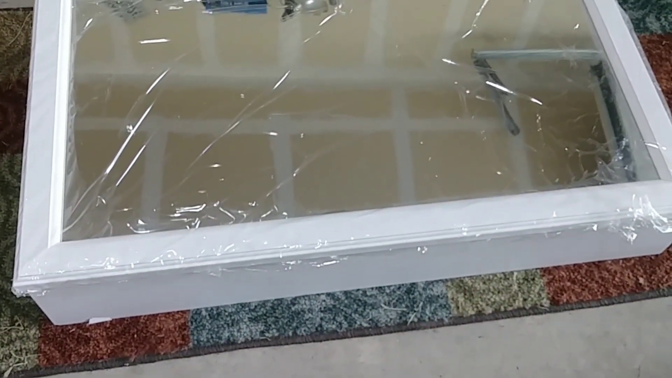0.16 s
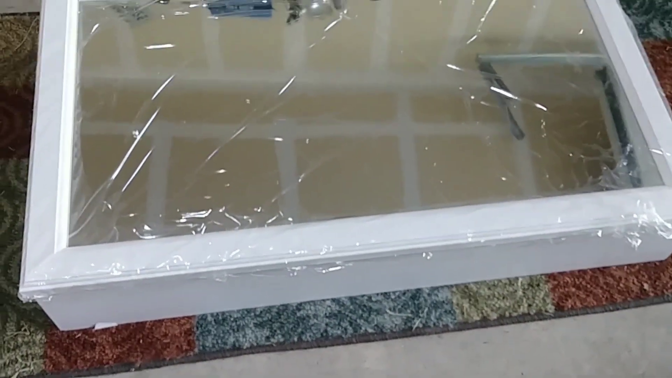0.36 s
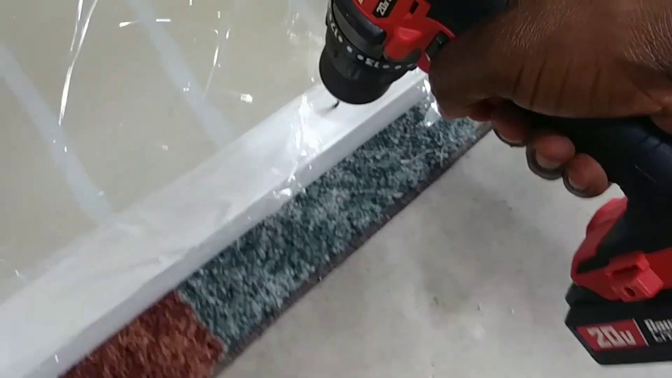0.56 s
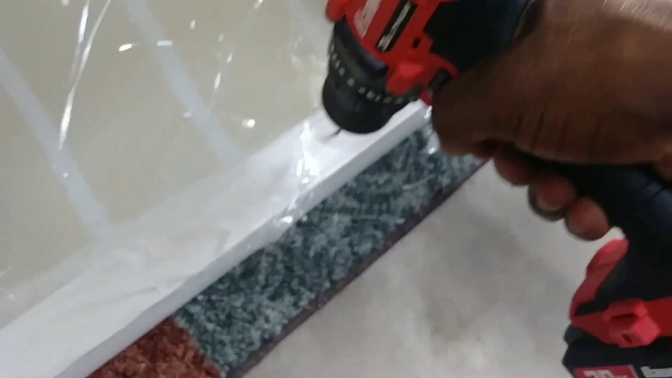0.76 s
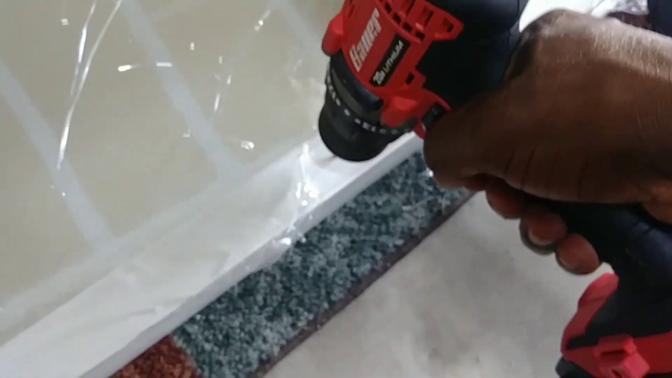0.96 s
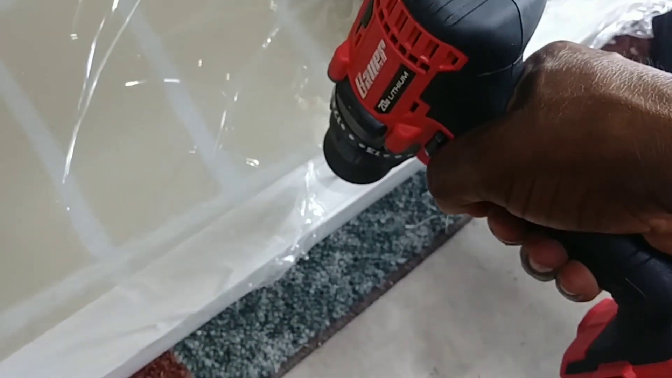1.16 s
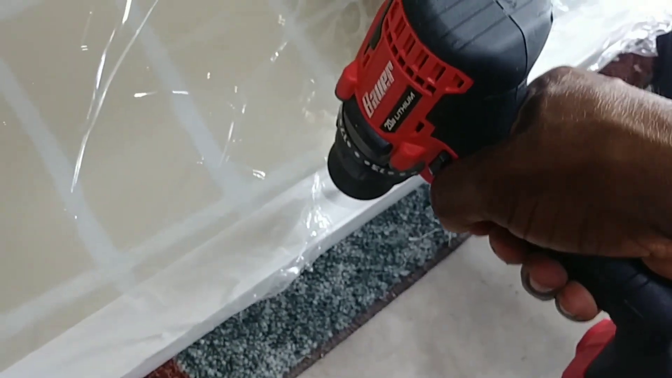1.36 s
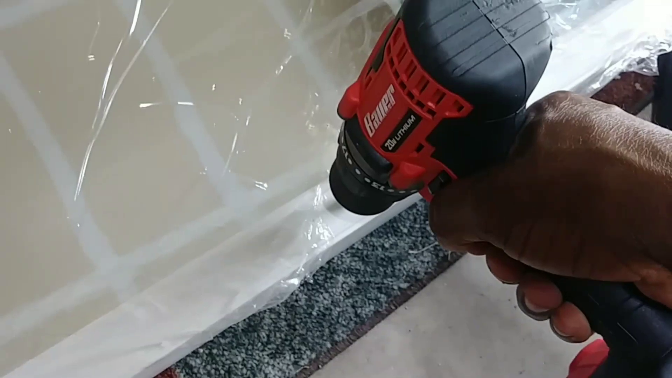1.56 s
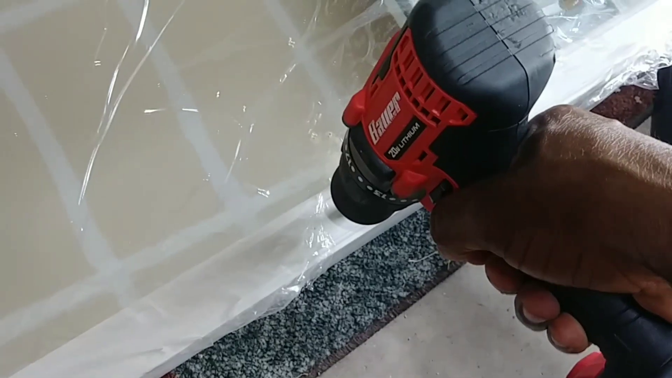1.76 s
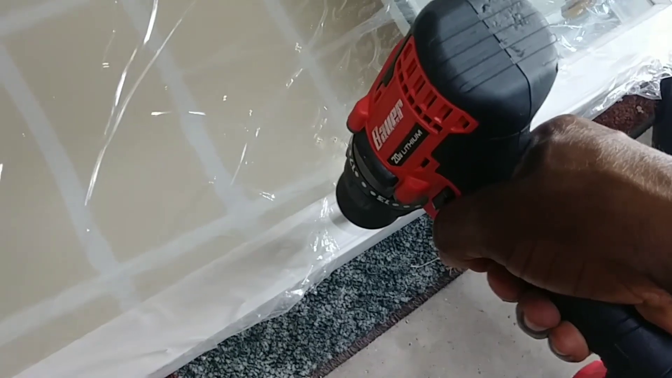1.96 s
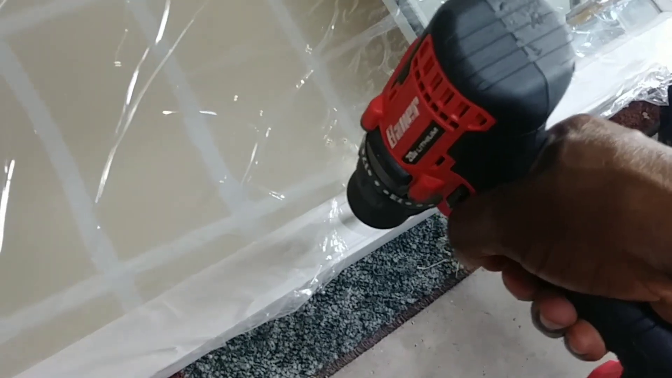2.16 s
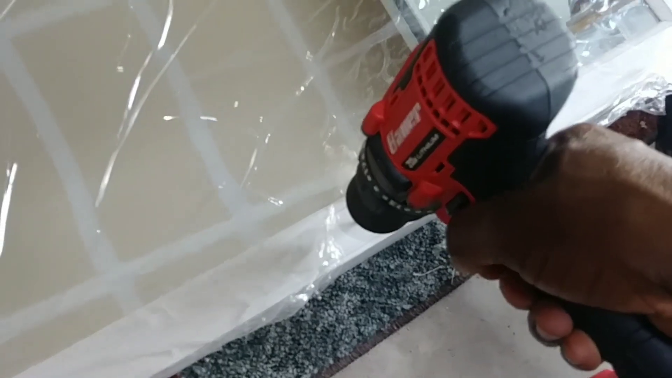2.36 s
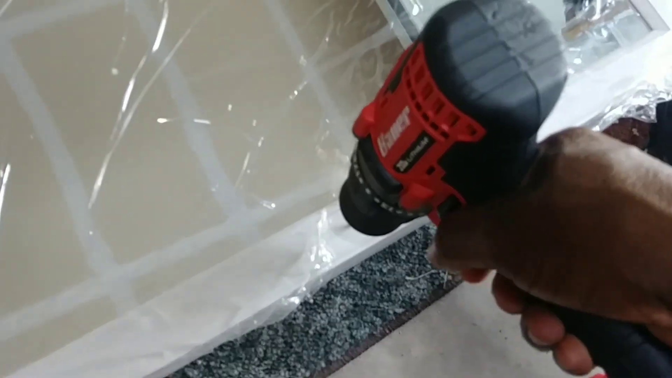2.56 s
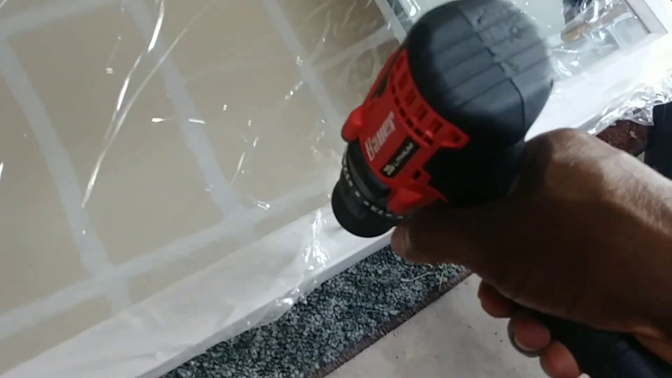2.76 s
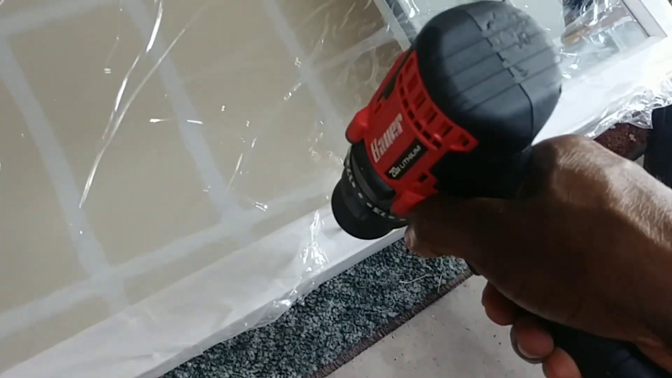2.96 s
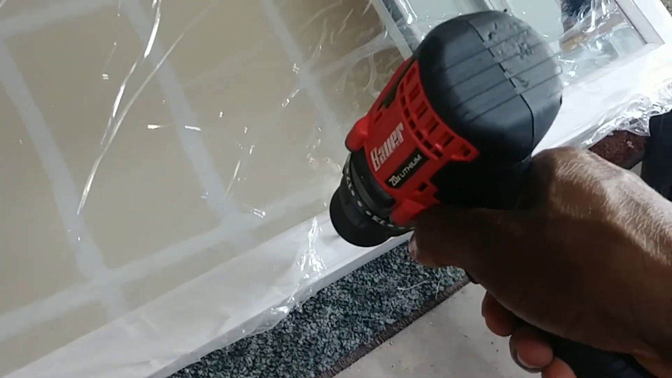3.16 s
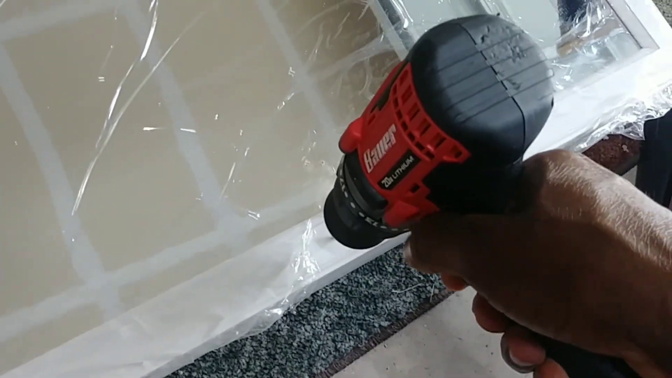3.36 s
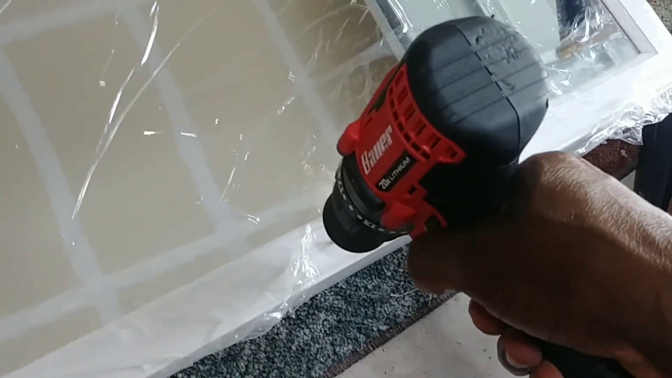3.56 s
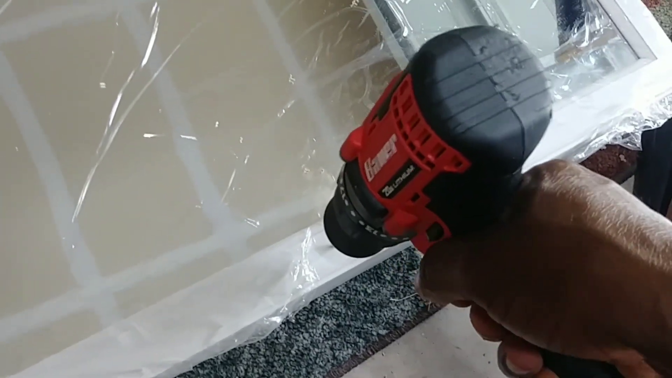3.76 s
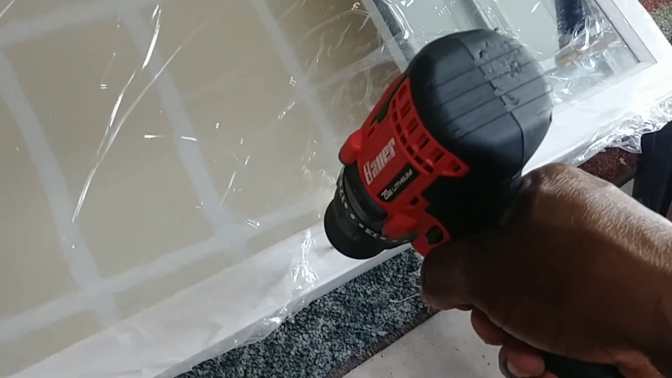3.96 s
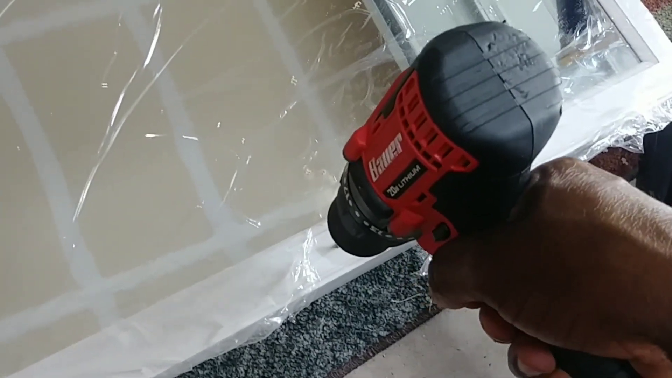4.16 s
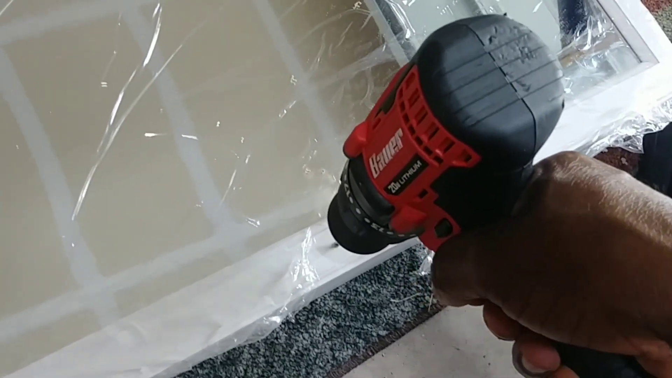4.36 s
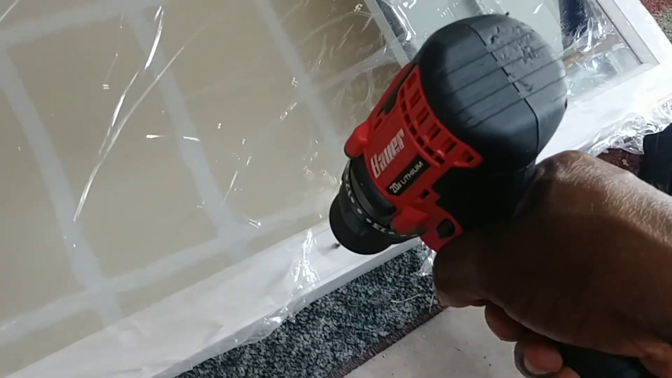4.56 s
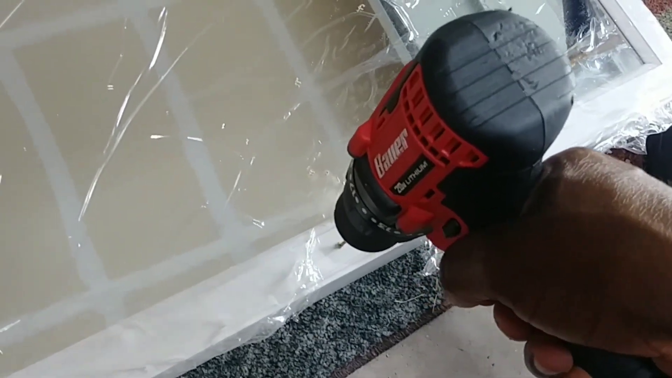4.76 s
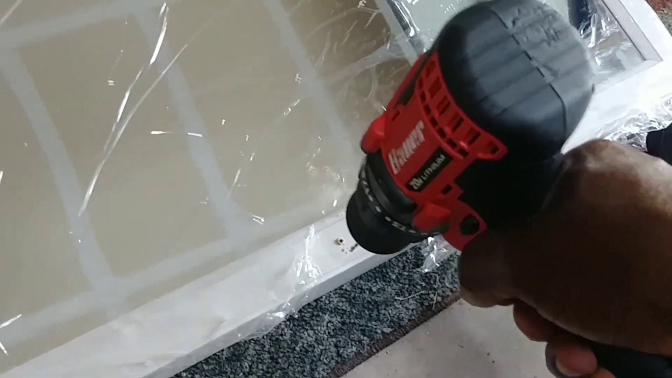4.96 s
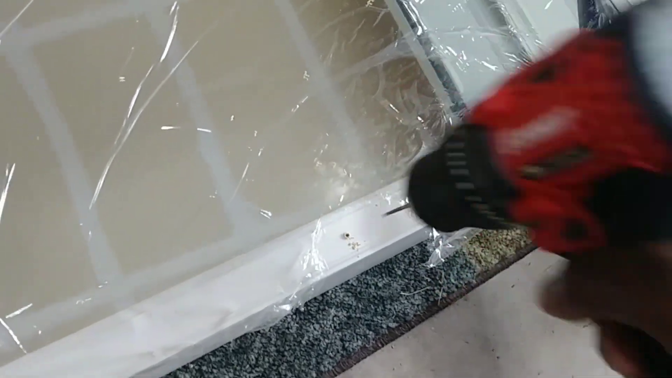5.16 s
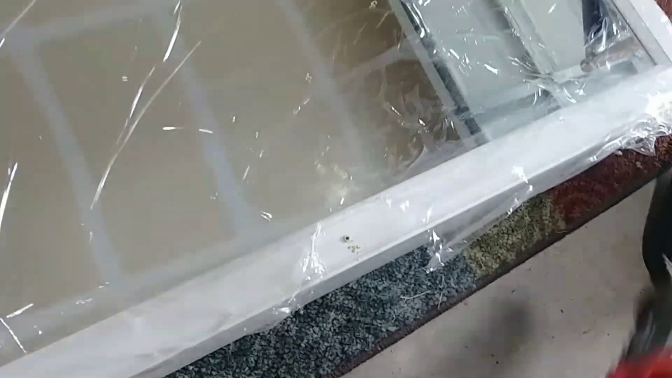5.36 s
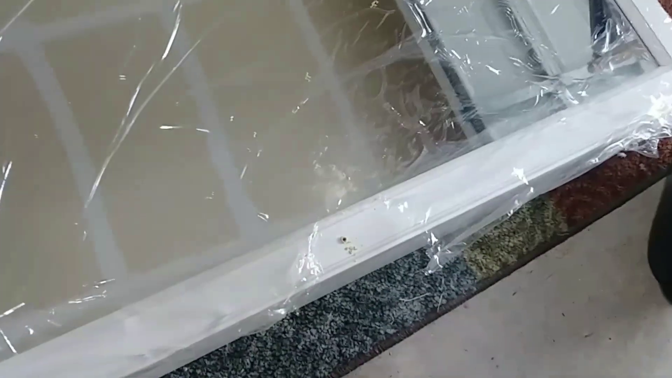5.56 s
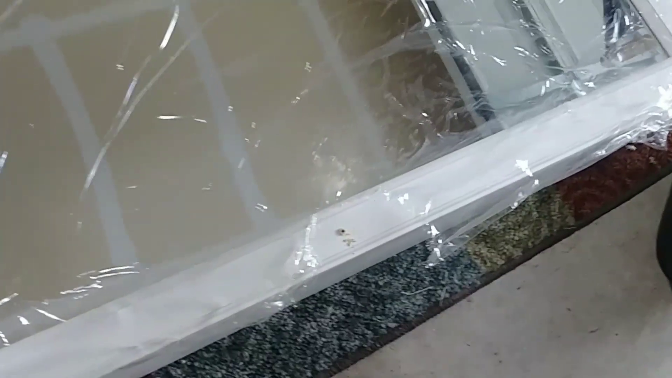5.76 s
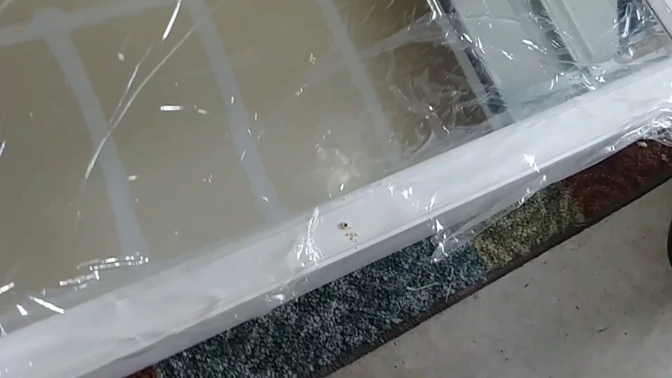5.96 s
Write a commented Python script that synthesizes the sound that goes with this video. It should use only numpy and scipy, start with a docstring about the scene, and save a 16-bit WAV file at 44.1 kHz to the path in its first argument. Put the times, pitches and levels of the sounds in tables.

```python
"""Cordless drill on a wooden frame

A cordless drill bores into a wooden frame in two bursts, close to a mono microphone in a bare room.
Motor and gear tones are sines locked to the shaft; they ride on gear grind, which is coloured noise.
Switch and brake clack as short rattles with a thunk. Low air noise and a far machine's hum lie below.
Before the first burst the sound pops, hisses and buzzes, drops out, then fades back in with the drill
already turning."""
import sys
import numpy as np
from scipy import signal
from scipy.fft import rfft, irfft, next_fast_len
from scipy.io import wavfile
from scipy.ndimage import uniform_filter1d

SR = 44100
rng = np.random.default_rng(int(sys.argv[2]) if len(sys.argv) > 2 else 0)


def master_out(mix):
    """Clip the mix to full scale and print it as 16-bit PCM to the path in sys.argv[1]."""
    frames = np.transpose(np.atleast_2d(mix))
    ceiling = np.clip(frames, -1, 1)
    pcm = np.round(ceiling * 32767).astype(np.int16)
    wavfile.write(sys.argv[1], SR, pcm)


N = 265482
T = np.arange(N) / SR
DROPOUT_START_S, DROPOUT_END_S = 0.5325, 0.5655


def amp(db):
    """Turns decibels into a plain factor."""
    return 10 ** (np.asarray(db) / 20)


def evened(x):
    """Scales x to rms 1."""
    return x / np.sqrt(np.mean(x ** 2) + 1e-20)


def read(points, hz):
    """Reads a curve of (f/Hz, value) points, with straight lines over log frequency."""
    f, value = np.transpose(points)
    return np.interp(np.log(hz + 1), np.log(f + 1), value)


def add(mix, s, sound):
    """Adds a sound into the mix, starting at s seconds."""
    part = mix[round(s * SR):][:len(sound)]
    part += sound[:len(part)]


def sine(turns):
    """A sine wave whose phase is counted in whole turns."""
    return np.sin(2 * np.pi * turns)


def shaped(x, points, bumps=()):
    """Filters x by the curve points, with bell-shaped bumps (f/Hz, width/Hz, level/dB), to rms 1."""
    size = next_fast_len(len(x))
    hz = np.fft.rfftfreq(size, 1 / SR)
    curve_db = read(points, hz)
    for f, width, db in bumps:
        curve_db = curve_db + db * np.exp(-((hz - f) / width) ** 2)
    filtered = irfft(rfft(x, size) * amp(curve_db), size)
    return evened(filtered[:len(x)])


def wander(length, per_s):
    """A random drift of about rms 1, stepped 200 times a second; a larger per_s makes it quicker."""
    steps = rng.standard_normal(int(length / SR * 200) + 50)
    smooth = signal.filtfilt([1], [1, -np.exp(-per_s / 200)], steps)
    return np.interp(np.arange(length) / SR * 200, np.arange(len(steps)), evened(smooth))


def blurred_noise(length, size):
    """Noise averaged twice over size samples, so that only slow flutter is left, at rms 1."""
    once = uniform_filter1d(rng.standard_normal(length), size=size)
    return evened(uniform_filter1d(once, size=size))


def drill_burst(pull, full_grind_db, levels, tones, grind_colour):
    """One pull of the trigger: tones locked to the shaft, gritty gear noise and the wood's rumble."""
    # resonances and dips of the drill's shell: f/Hz, width/Hz, level/dB
    shell_bumps = [(1122, 160, 5.5), (1822, 140, 5.5), (4540, 400, 5), (1490, 110, -4), (8820, 730, 4.5),
                   (11800, 670, -3.5), (14000, 1300, 3)]
    # colour of the wood's rumble, only its shape counts: f/Hz, level/dB
    rumble_colour = [(24, -79), (40, -50), (135, -20), (166, -12), (275, 1.5), (330, -8), (400, -11),
                     (520, -39), (880, -120)]
    blades, pinion_teeth = 18, 5  # tones per turn of the shaft
    spin_up_s, brake_s, coast_hz_per_s = 0.051, 0.04, 450
    frame_hz, frame_width_hz, frame_db = 280, 68, 17  # resonance of the frame
    chuck_turns_per_shaft_turn = 0.062

    # shaft speed: spins up, drifts, coasts after release, then the brake stops it
    start, release, brake, free_hz, drift = pull
    t = np.arange(start, brake + brake_s, 1 / SR)
    spun = 1 - np.exp(-(t - start + 1e-4) / spin_up_s)
    coasted_s = np.clip(t - release, 0, brake - release)
    hz = spun * (free_hz + drift * (t - start)) - coast_hz_per_s * coasted_s
    turning = np.clip(1 - (t - brake) / brake_s, 0, 1)  # 1 until the brake bites, then down to 0
    turns = np.cumsum(hz * turning) / SR

    # levels: set curves, each with its own random waver
    s, *columns = np.transpose(levels)
    whine_db, shaft_db, pinion_db, octave_db, rumble_db = (np.interp(t, s, c) for c in columns)
    grind_db = full_grind_db + 1.6 * 20 * np.log10(spun)  # grind goes as speed to the power 1.6
    grind_db -= 6 * (1 - turning)
    whine_db += 1.4 * wander(len(t), 40)
    # the shaft tone swells as it sweeps through the frame's resonance
    shaft_db += frame_db * np.exp(-((hz - frame_hz) / frame_width_hz) ** 2)
    shaft_db += 0.87 * wander(len(t), 50)
    pinion_db += 1.2 * wander(len(t), 80)
    octave_db += 1.3 * wander(len(t), 50)
    rumble_db += 6.5 * (1 - turning) + 1.7 * wander(len(t), 71)  # more rumble under the brake

    out = amp(whine_db) * sine(blades * turns)
    out += amp(shaft_db) * turning ** 2 * sine(turns)
    out += amp(pinion_db) * sine(pinion_teeth * turns)
    out += amp(octave_db) * sine(2 * pinion_teeth * turns)
    out *= np.minimum((t - start) / 0.02, 1)
    for multiple, db in tones:
        tone_db = db + grind_db + 1.17 * wander(len(t), 28)
        out += amp(tone_db) * sine(multiple * turns + rng.random())
    # sqrt(2) turns peak into rms; the tones die before the shaft stands still
    out *= np.sqrt(2) * np.clip((turning - 0.25) / 0.4, 0, 1)

    grit = amp(0.9 * wander(len(t), 900)) * rng.standard_normal(len(t))  # uneven tooth contact
    wobble_db = -0.45 * sine(chuck_turns_per_shaft_turn * turns)  # once per turn of the chuck
    out += amp(grind_db + wobble_db) * shaped(grit, grind_colour, shell_bumps)
    out += amp(rumble_db) * spun * shaped(rng.standard_normal(len(t)), rumble_colour)
    heard = t > DROPOUT_END_S  # the drill is silent until the dropout is over
    return start, out * heard * signal.windows.tukey(len(t), 0.002)


def switching():
    """At a light touch the electronics chop the current: a tone and octave that roughen as the rotor stirs."""
    # path of the singing tone: t/s, f/Hz, level/dB, roughness (0 to 1)
    path = [(3.88, 4200, -48, 0), (3.895, 4200, -42, 0.3), (3.915, 4370, -35, 0.8), (3.935, 4300, -44, .9)]
    s, *columns = np.transpose(path)
    t = np.arange(s[0], s[-1], 1 / SR)
    hz, db, rough = (np.interp(t, s, c) for c in columns)
    turns = np.cumsum(hz) / SR
    tone = sine(turns) + amp(-21) * sine(2 * turns)
    roughened = tone * (1 - rough + rough * blurred_noise(len(t), 40))
    return s[0], amp(db) * roughened * signal.windows.tukey(len(t), 0.08)


def click(db, tilt_db, rise_s, t60, thunk_hz, thunk_db):
    """A blow and a weak bounce rattle the casing; the frame answers with a short thunk."""
    # colour of the casing, only its shape counts: f/Hz, level/dB
    casing_colour = [(150, -40), (250, -7), (900, -24), (1450, -12.5), (2000, -13), (2900, -1), (4000, -1),
                     (4600, 6.5), (6000, -8.5), (7300, -2.5), (9500, -15), (11000, -28), (15800, -44)]
    # ringing modes of the chuck: f/Hz, level against the rattle/dB, time to fall 60 dB/s
    chuck_modes = [(1430, -14, 0.043), (2780, -18.5, 0.059)]
    t = np.arange(4000) / SR
    rise = np.clip(t / rise_s, 0, 1)
    colour = [(f, d + tilt_db * np.log2(f / 2000)) for f, d in casing_colour]
    blow = amp(-60 * t / t60) * rise
    bounce = 0.18 * np.roll(blow, 700)  # 16 ms later
    rattle = shaped(rng.standard_normal(len(t)), colour) * (blow + bounce)
    for hz, ring_db, ring_s in chuck_modes:
        rattle += amp(ring_db - 60 * t / ring_s) * rise * sine(hz * t)
    thunk_rise = np.clip(t / (rise_s + 0.00088), 0, 1)
    thunk = amp(thunk_db - 60 * t / 0.045) * thunk_rise * sine(thunk_hz * t)
    return amp(db) * (rattle / abs(rattle).max() + thunk)


def room(x):
    """Sparse echoes of random sign, each band dying at its own speed; a trembling hand blends three tails."""
    # colour of the echoes, only its shape counts: f/Hz, level/dB
    echo_colour = [(300, -1.5), (1000, -2), (3000, -0.5), (8000, -2)]
    # dying away, before the early closing: f/Hz, time to fall 60 dB/s
    decay_times = [(200, 0.55), (1000, 0.32), (4000, 0.29), (5700, .24), (7000, 0.34), (9000, .25),
                   (12000, 0.3)]
    closes_s, sway_s = 0.3, 0.3  # tails lose 10 dB more by closes_s; shares repeat in strength each sway_s
    out = np.zeros(N)
    for k in range(3):
        taps = np.zeros(SR // 2)
        at = np.arange(300, SR // 2 - 20, 20)
        at = at + rng.integers(0, 20, len(at))
        taps[at] = rng.choice([-1., 1.], len(at))
        hz, t, bands = signal.stft(taps, SR, nperseg=256)
        tail_db = read(echo_colour, hz)[:, None] - 60 * t / read(decay_times, hz)[:, None]
        tail_db = tail_db - 10 * (t / closes_s) ** 3
        tail = signal.istft(bands * amp(tail_db), SR, nperseg=256)[1]
        share = np.sqrt(2 / 3) * np.cos(np.pi * (T / sway_s + k / 3))  # total power stays even
        out += signal.oaconvolve(x * share, tail / np.linalg.norm(tail))[:N]
    return out


def pop(db, thump_hz, t60, snap_hz, snap_db, rise_s):
    """A low push with a sharp snap of opposite sign on its front."""
    t = np.arange(1500) / SR
    rise = np.minimum(t / rise_s, 1)
    thump = rise * amp(-60 * t / t60) * sine(thump_hz * t)
    thump = thump + 0.074 * np.roll(thump, 230)  # a small bounce
    snap = rise * amp(snap_db - 60 * t / 0.00059) * sine(snap_hz * t)
    return amp(db) * (thump - snap)


def pops_hiss_and_buzz():
    """Dry pops, coloured noise as a hiss around them, and a chopped-off buzz of steady tones."""
    # pops: t/s, level/dB, thump f/Hz, thump's time to fall 60 dB/s, snap f/Hz,
    # snap level against the thump/dB, rise/s
    pop_list = [(0.406, -3.5, 337, 0.0033, 4580, 1.5, .00002), (0.4427, -5.5, 1100, 0.0043, 3130, 6, .0002)]
    # tones of the buzz: f/Hz, level/dB
    buzz_tones = [(361, -17), (1780, -29), (2580, -28.5), (647, -33), (1166, -39), (2140, -39), (3210, -37)]
    buzz_start_s, buzz_end_s = 0.5258, 0.5322
    hiss_start_s, hiss_end_s, hiss_db = 0.4, 0.526, -49
    out = np.zeros(N)
    for s, *row in pop_list:
        add(out, s, pop(*row))
    t = np.arange(0, buzz_end_s - buzz_start_s, 1 / SR)
    buzz = sum(amp(db) * np.cos(2 * np.pi * hz * (t - 0.0003)) for hz, db in buzz_tones)
    add(out, buzz_start_s, -buzz)
    colour = [(100, 4), (2000, -4), (5000, -18), (6000, -32), (15000, -31)]  # f/Hz, level/dB
    noise = rng.standard_normal(round((hiss_end_s - hiss_start_s) * SR))
    add(out, hiss_start_s, amp(hiss_db) * shaped(noise, colour))
    return out


def background():
    """Low air noise, a far machine's hum of wavering sines, and faint tones and thuds that come and go."""
    # colour of the air noise, only its shape counts: f/Hz, level/dB
    air_colour = [(18, -58.5), (30, -30.5), (103, -5), (258, -8.5), (353, -5.5), (509, -33), (1060, -35),
                  (1180, -35.5), (1660, -37), (2870, -38.5), (5830, -48), (12200, -52.5), (15800, -66)]
    # tones of the hum: f/Hz, level before a lift of 4 dB/dB
    hum_tones = [(113.0, -67.5), (231.5, -70), (290.7, -70), (349.9, -60.5), (640.6, -93), (1168, -88.5),
                 (1287, -89)]
    # faint tones and thuds: t/s, length/s, f/Hz, level/dB
    faint_tones = [(0, 0.16, 2210, -66.5), (0.066, 0.18, 1170, -66.5), (0.076, 0.16, 995, -69),
                   (0.246, .08, 1287, -75), (.31, .09, 1168, -72), (0.075, 0.056, 295, -50),
                   (3.473, .04, 118, -49.5), (5.609, 0.07, 980, -64), (5.647, 0.048, 686, -54),
                   (5.698, 0.023, 650, -56.5), (5.544, 0.093, 644, -58), (5.716, .12, 670, -65),
                   (5.8, 0.041, 505, -65), (5.958, 0.05, 118.5, -47.5)]
    air_db = -59.5 + 2.0 * wander(N, 25)
    out = amp(air_db) * shaped(rng.standard_normal(N), air_colour)
    for hz, db in hum_tones:
        hum_db = db + 4.0 + 2.2 * wander(N, 40)
        out += amp(hum_db) * sine(hz * T + rng.random())
    for s, length, hz, db in faint_tones:
        t = np.arange(0, length, 1 / SR)
        blur = 1 + 0.55 * blurred_noise(len(t), 300)
        add(out, s, amp(db) * blur * sine(hz * t) * signal.windows.tukey(len(t), 0.7))
    return out


def scene():
    """Two bursts, the singing electronics and the clicks sound in the room, over the background."""
    # trigger pulls, forward then reverse: pulled t/s, released t/s, brake bites t/s,
    # free shaft speed f/Hz, drift/(Hz per s)
    pulls = [(0.3, 2.722, 2.76, 434.25, -1.6), (3.904, 5.29, 5.38, 403.7, 1.0)]
    # one table a pull: t/s, fan whine level/dB, shaft tone level before its swell/dB,
    # pinion tone level/dB, pinion octave level/dB, rumble of the wood level/dB
    level_curves = [
        [(0.57, -22.5, -29, -27, -43, -38), (1.06, -26, -32, -27, -44, -41), (1.44, -21, -34.5, -38, -38, -41),
         (1.6, -15, -36.5, -44, -35, -38), (1.8, -21, -41, -41, -39, -37.5),
         (1.88, -18.5, -31.5, -40, -39, -38), (2.24, -31.5, -38.5, -41.5, -31.5, -40),
         (2.6, -22, -35.5, -39, -30, -39.5), (2.72, -20.5, -35.5, -32, -31.5, -39.5),
         (2.76, -23.5, -39, -32, -34, -39)],
        [(3.92, -49, -49, -39, -45, -31), (3.95, -29.5, -46.5, -41, -40, -33.5),
         (3.98, -32.5, -40, -37, -43, -40), (4.1, -30, -41, -29.5, -33, -47.5),
         (4.36, -23, -43.5, -37.5, -32.5, -43), (4.5, -29, -45, -31, -31, -44),
         (4.92, -30.5, -39, -31.5, -32, -51.5), (4.99, -35, -45.5, -24, -30.5, -58),
         (5.13, -27.5, -49, -27, -33, -61.5), (5.25, -34.5, -49, -23.5, -33, -59.5),
         (5.35, -21.5, -40.5, -27.5, -33.5, -57), (5.38, -25.5, -46.5, -26, -35.5, -65)],
    ]
    # tones on the shaft speed, one table a pull: multiple of the speed, level against the grind/dB
    shaft_tones = [
        [(2, -24.5), (3, -21.5), (4, -13.5), (9, -18), (13, -32), (15, -21), (16, -31), (17, -35), (19, -34),
         (20, -26), (21, -29), (22, -32), (23, -35), (25, -46.5), (28, -51.5), (29, -43), (30, -44.5),
         (32, -51), (36, -43.5)],
        [(2, -19.5), (3, -19), (4, -22), (6, -20.5), (8, -19.5), (11, -14.5), (13, -26), (15, -24), (17, -28.5),
         (19, -24), (20, -22.5), (21, -29.5), (22, -30.5), (23, -38), (24, -33.5), (25, -30), (27, -48.5),
         (29, -59), (30, -45), (31, -48.5), (34, -50), (35, -48), (36, -40), (37, -58), (38, -49)],
    ]
    # colour of the gear grind, one table a pull, only its shape counts: f/Hz, level/dB
    grind_colours = [
        [(180, -48.5), (300, -15), (372, -26.5), (432, -11), (485, -12.5), (1270, -8.5), (1450, -10.5),
         (1770, -1.5), (2200, -0.5), (4410, -3.5), (5840, -14), (7370, -12.5), (8000, -14.5), (11500, -32),
         (15800, -42)],
        [(180, -52), (300, -20.5), (398, -19.5), (711, -13), (798, -12), (882, -11.5), (1230, -10),
         (1430, -7.5), (1990, -0.5), (3610, -2), (4060, -1), (5650, -13.5), (7490, -12.5), (11200, -30.5),
         (15800, -41)],
    ]
    # switch clicks and brake clacks: t/s, rattle peak/dB, treble tilt/(dB per octave), rise/s,
    # rattle's time to fall 60 dB/s, thunk f/Hz, thunk level against the rattle peak/dB
    click_list = [(2.759, -5, 4, 0.0026, 0.047, 562, -14.5), (3.1158, -21.5, -3.5, 0.0019, 0.022, 556, -17),
                  (3.197, -20, -2.5, 0.0014, 0.024, 550, -27), (3.925, -22.5, -1, 0.0008, 0.033, 593, 4.5),
                  (5.378, -4, 7.5, 0.0023, 0.034, 553, -15), (5.39, -19.5, -1, 0.0082, .05, 540, 8.5),
                  (5.554, -41, -5, .014, 0.054, 345, -7.5)]
    full_grind_db = (-18.5, -20)  # gear grind at full speed, one a pull
    room_db = -9.5
    drill = np.zeros(N)
    for parts in zip(pulls, full_grind_db, level_curves, shaft_tones, grind_colours):
        add(drill, *drill_burst(*parts))
    add(drill, *switching())
    for s, *row in click_list:
        add(drill, s, click(*row))
    mix = drill + amp(room_db) * room(drill) + background() + pops_hiss_and_buzz()
    return np.array([mix, mix])


def record(dry):
    """A microphone weak in the bass, a moment of silence and a fade back in, then a treble limit."""
    fade_in_s, fade_curve, treble_limit_hz = 0.28, 0.6, 15740
    fade = np.clip((T - DROPOUT_END_S) / fade_in_s, 0, 1) ** fade_curve
    on = np.where(T < DROPOUT_START_S, 1, fade)
    thin = signal.lfilter(*signal.butter(2, 60, "high", fs=SR), dry) * on
    low_pass = signal.firwin(1023, treble_limit_hz, window=("kaiser", 9), fs=SR)
    return signal.oaconvolve(thin, low_pass[None], "same")


dry = scene()
out = record(dry)
master_out(out)
```